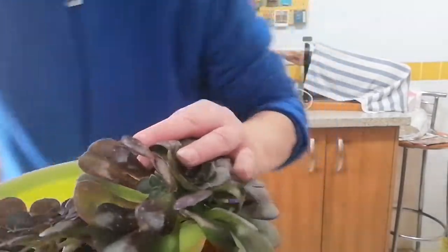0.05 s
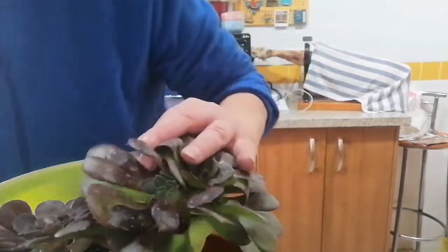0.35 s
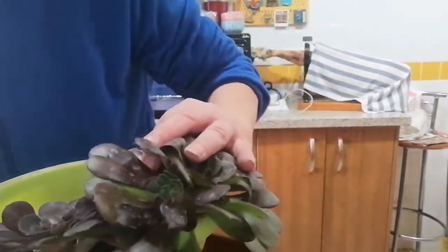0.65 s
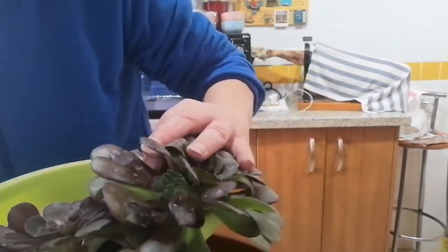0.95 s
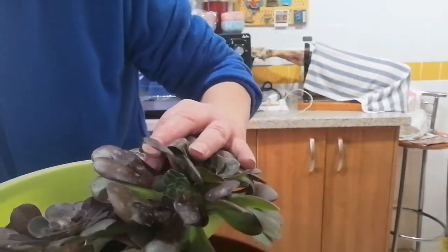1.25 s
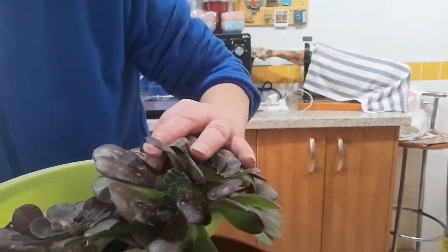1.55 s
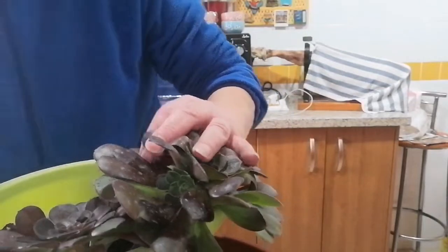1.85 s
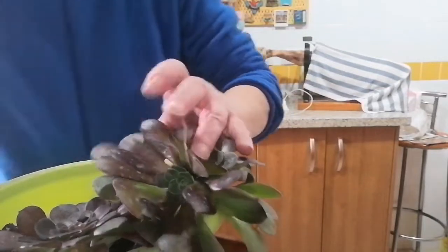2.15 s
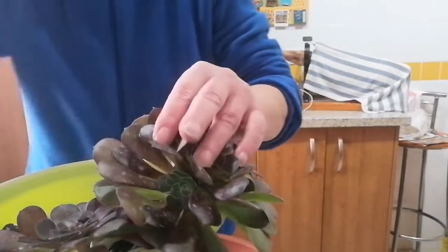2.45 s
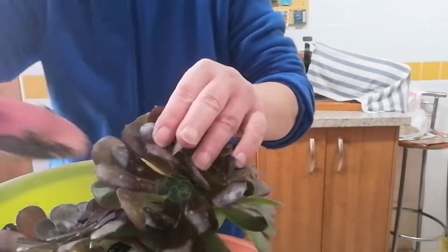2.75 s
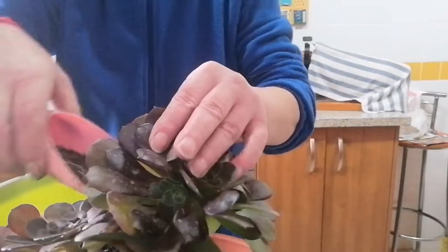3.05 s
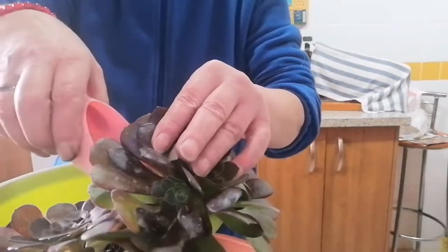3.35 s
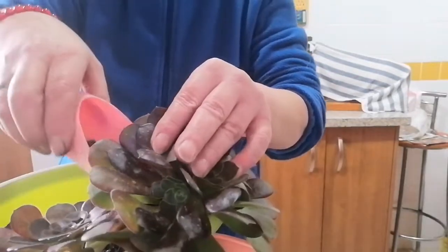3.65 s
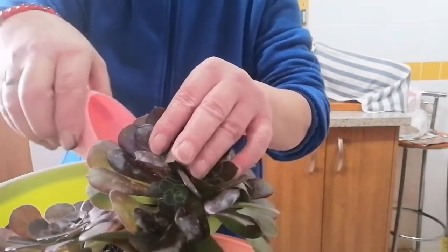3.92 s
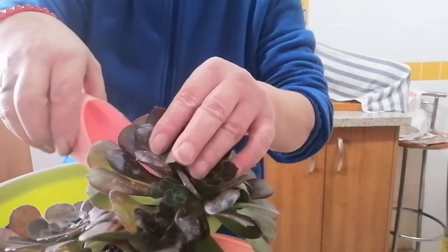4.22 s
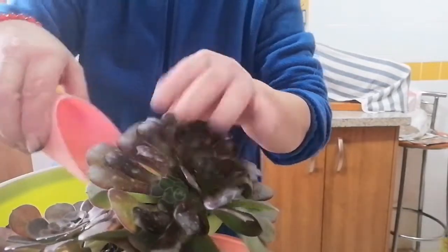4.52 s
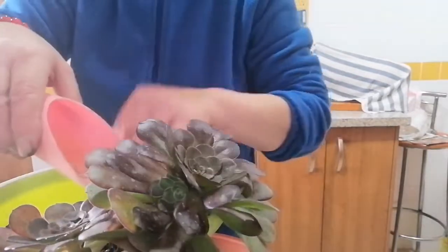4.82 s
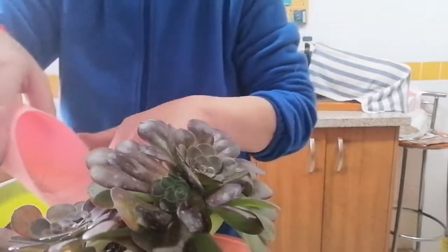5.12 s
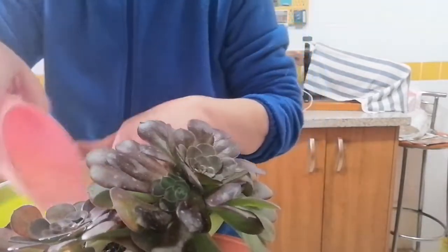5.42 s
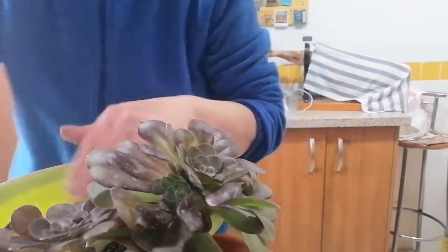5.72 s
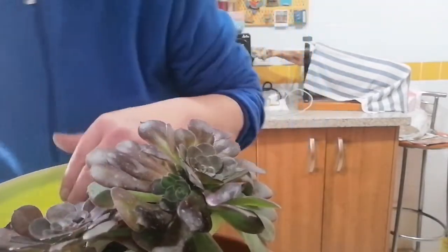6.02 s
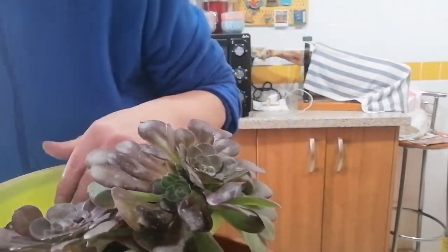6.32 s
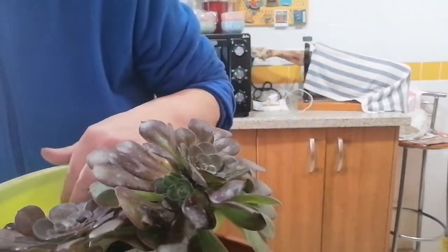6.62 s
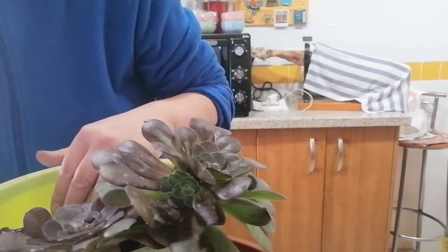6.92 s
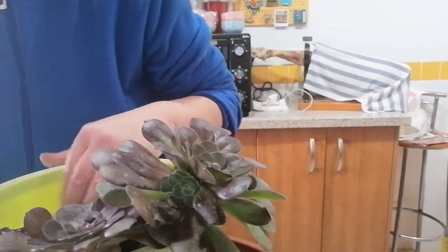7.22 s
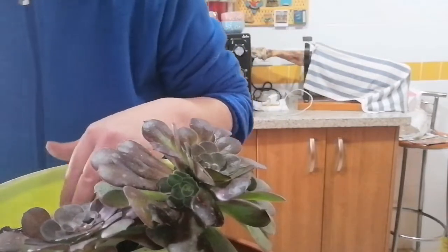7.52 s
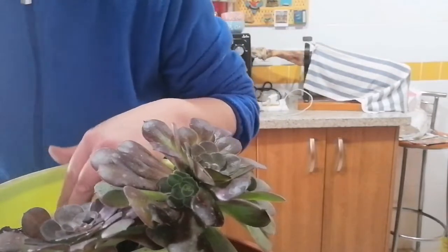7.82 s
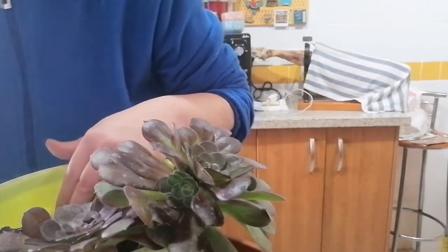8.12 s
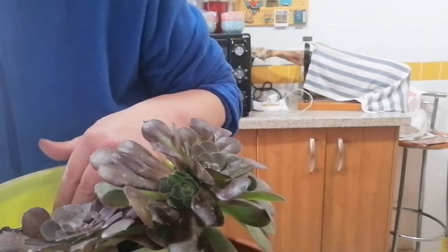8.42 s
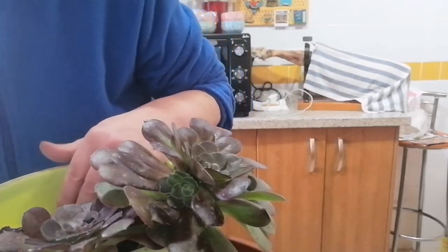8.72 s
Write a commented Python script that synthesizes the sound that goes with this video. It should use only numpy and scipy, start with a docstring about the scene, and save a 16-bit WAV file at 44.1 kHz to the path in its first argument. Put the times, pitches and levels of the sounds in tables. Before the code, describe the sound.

Hands work a potted succulent close to the microphone in a small tiled kitchen. From the start, fleshy leaves rub in short hissing, rasping strokes, with soft hollow knocks on a plastic basin around 0.3 seconds and again between 1 and 1.7. A leaf snaps crisply with a tiny squeak at 0.75 seconds. Smaller snaps follow after 2 seconds, then a cluster of leaf ticks and soil grains tapping a plastic scoop near 2.7 to 3. The scoop scrapes faintly on and off until about 5.9 seconds; a little soil falls at 4, followed by a small squeaky snap. The loudest snaps come at 6 seconds, with two basin knocks, and at 6.4 with a brief squeak. Sparse ticks and light rubbing continue to the end. Underneath are quiet room air, slight table rumble and a faint deep hum swelling near 8 seconds.

```python
"""Handling a potted succulent.

Close up in a small tiled kitchen, fleshy leaves rub by countless tiny slips, tick, squeak and snap off.
Knocks ring a plastic basin and its table; a small hollow scoop scrapes between the leaves; soil falls.
Every slide speeds up, peaks early and slows to a stop. Behind it: room air, table rumble, a late hum."""
import sys
import numpy as np
from scipy import signal
from scipy.fft import rfft, irfft, next_fast_len
from scipy.io import wavfile
from scipy.ndimage import uniform_filter1d, map_coordinates

SR = 44100
rng = np.random.default_rng(int(sys.argv[2]) if len(sys.argv) > 2 else 0)


def master(y):
    """Save y as 16-bit WAV."""
    cut = np.clip(np.atleast_2d(y).T, -1, 1)
    pcm = np.round(cut * 32767)  # scale
    wavfile.write(sys.argv[1], SR, pcm.astype(np.int16))


N = 386316
TIME_S = np.arange(N) / SR

# Finger strokes on the leaves. Each row: start in seconds, length in seconds, hiss in dB, rasp in dB.
STROKES = [(0.161, 0.28, -60, -64), (0.329, 0.2, -53.5, -59), (0.544, 0.13, -56.5, -71),
           (0.663, 0.62, -47.5, -63.5), (0.948, 0.16, -46, -50), (1.155, 0.22, -47, -54.5),
           (1.333, 0.062, -44.5, -48), (1.416, 0.12, -50.5, -49), (1.47, 0.49, -61.5, -61),
           (1.832, 0.37, -59.5, -67), (2.15, 0.32, -55, -71.5), (2.631, 0.25, -46.5, -64.5),
           (2.867, 0.48, -59.5, -71.5), (3.084, 0.27, -60.5, -73), (3.322, 0.48, -59, -69),
           (3.647, 0.13, -50, -63), (3.91, 0.11, -49.5, -62), (4.062, 0.092, -54.5, -63),
           (4.274, 0.12, -59, -77), (4.43, 0.059, -52, -63), (4.676, 0.031, -54.5, -65),
           (4.971, 0.12, -61.5, -68), (5.522, 0.38, -59, -73), (5.724, 0.069, -50, -65.5),
           (5.868, 0.42, -52, -67.5), (6.326, 0.39, -58, -57.5), (7.232, 0.054, -55, -77),
           (7.301, 0.072, -53, -63), (7.869, 0.16, -62, -65), (8.399, 0.14, -53.5, -59.5),
           (8.588, 0.7, -61.5, -70.5)]
# Top treble of the rubbing. Each row: time in seconds, gain in dB.
SHEEN = [(0.7, 12.5), (0.9, 3), (2.7, 12.5), (3.8, 4), (4.2, -4), (5.6, 9)]
# Leaves snapping and striking. Each row: start in seconds, crack in dB, shiver relative to the crack
# in dB, thump in dB, body in dB, crack ring in Hz, body ring in Hz, left over right in dB.
SNAPS = [(0.7472, -33, -32, -38, -37, 7400, 1520, 7.5), (0.778, -44.5, -20, -39, -33, 5300, 880, 1.5),
         (2.1637, -43.5, -13, -81, -85, 5200, 2500, 0.5), (2.4257, -52, -12, -72, -42.5, 6200, 2450, 5.5),
         (4.1985, -48.5, -8, -52, -42, 5300, 3030, -4.5), (6.009, -31, -1, -39.5, -40.5, 5900, 1370, 5),
         (6.0274, -30.5, -6, -64, -43, 8100, 3320, -1.5), (6.3659, -38, 14, -35, -33, 6400, 2650, 2.5),
         (6.4002, -35, -2, -42, -40, 6700, 2700, 2), (7.1256, -47.5, -11, -45, -39, 5400, 1320, 3),
         (7.452, -53.5, -20, -89, -59.5, 5170, 1890, 6.5), (8.1451, -38.5, -30, -56, -57, 7600, 3000, 5.5)]
# Leaf flicks. Each row: start in seconds, edge in dB, blade in dB.
TICKS = [(0.288, -54.5, -52.5), (1.125, -50, -55.5), (2.619, -51, -83), (2.625, -46, -64),
         (2.698, -47, -48), (2.738, -39.5, -45), (2.742, -42, -63), (2.7523, -56, -71), (2.7802, -43, -52),
         (2.88, -51, -65), (2.9207, -47.5, -57), (2.95, -48.5, -68), (3.9273, -53, -75),
         (4.006, -47, -56.5), (4.049, -56, -57), (6.0805, -49, -56), (6.1301, -72, -54),
         (7.5348, -56.5, -70), (8.164, -60, -55.5), (8.1771, -50, -62.5), (8.716, -57, -74)]
# Waxy squeaks. Each row: start in seconds, length in seconds, first and last pitch in Hz, level in dB.
SQUEAKS = [(0.7777, 0.014, 1647, 715, -27.5), (2.165, 0.013, 2610, 2390, -48),
           (2.279, 0.023, 2590, 2460, -57.5), (2.314, 0.021, 3400, 3130, -54),
           (4.1986, 0.0019, 3380, 2900, -26.5), (4.2003, 0.00287, 1760, 1094, -30),
           (6.402, 0.014, 1016, 870, -25.5)]
# Knocks on the basin. Each row: start in seconds, wall in dB, boom in dB.
KNOCKS = [(0.192, -55.5, -65), (0.288, -39, -45), (0.396, -52, -51.5), (1.065, -50.5, -76),
          (1.362, -53.5, -65), (1.51, -60, -58.5), (1.66, -63.5, -71), (2.697, -60.5, -63.5),
          (6.0746, -38.5, -68), (6.13, -40, -39)]
# Modes of the basin on its table. Each row: frequency in Hz, relative level in dB, T60 in seconds.
BOOM_MODES = [(131, -9, 0.17), (143, -8, 0.31), (174.4, -10.5, 0.33)]
WALL_MODES = [(302, -24, 0.44), (340.2, -11, 0.25), (379, -10.5, 0.058), (500, 3.5, 0.048),
              (569.6, 4.5, 0.097)]
# Slides on plastic. Each row: start in seconds, length in seconds, level in dB, resonance in Hz.
SCOOP_SCRAPES = [(2.004, 0.41, -67.5, 822), (3.295, 0.44, -75, 956), (3.624, 0.093, -62.5, 960),
                 (3.93, 0.14, -61, 963), (4.335, 0.036, -56, 993), (4.466, 0.034, -55, 950),
                 (4.681, 0.033, -58, 940), (5.58, 0.29, -63.5, 980)]
BASIN_DRAGS = [(.85, 0.74, -54, 533), (6.645, 0.043, -55, 525), (6.936, 0.067, -56, 550),
               (8.147, 0.17, -57.5, 330)]
# Grains hitting the scoop. Each row: start in seconds, level in dB.
GRIT = [(2.7529, -50), (2.784, -57), (2.893, -63), (2.945, -64), (2.987, -61.5), (3.02, -60)]
# Falling soil and shoves of the pot. Each row: start in seconds, length in seconds, level in dB.
SOIL_FALLS = [(3.95, 0.29, -54.5)]
POT_SHOVES = [(.15, 0.54, -59), (1.125, 0.2, -52.5), (1.3, 0.39, -70), (3.96, 0.67, -61), (4.15, 1.82, -66),
              (8.1, 0.6, -68)]
# Hand position. Each row: time in seconds, left over right in dB.
HAND_PAN = [(0, 5.5), (2.4, 5.5), (2.9, 2), (3.6, 3), (4.1, 0.5), (4.7, -0.5), (5.2, -2.5), (5.8, 4),
            (8.7, 5.5)]
# Deep hum. Each row: time in seconds, level in dB.
HUM_SWELL = [(6.5, -74.5), (8.3, -63.5), (8.8, -63.5)]
# Source spectra. Each row: frequency in Hz, relative density in dB.
HISS_SPECTRUM = [(2120, -38), (3600, -14.5), (4340, -16.5), (5170, -4), (6010, -8), (6900, -1),
                 (10900, -13), (13800, -25), (15100, -17), (16400, -46)]
RASP_SPECTRUM = [(150, -15), (600, -5.5), (1100, -0.5), (2000, 0), (2900, 5), (4000, -10), (6000, -32)]
CRACK_SPECTRUM = [(1500, -47.5), (4200, -3.5), (5400, 5.5), (7200, 3.5), (8800, 3.5), (10500, -6),
                  (13000, -6), (15500, -10.5)]
BODY_SPECTRUM = [(400, -48), (850, 2.5), (1400, 1.5), (2000, 1), (2900, -0.5), (3900, -8.5), (8000, -46)]
THUMP_SPECTRUM = [(40, -26.5), (150, 1.5), (220, -5), (330, 1.5), (560, 1), (1100, -19), (6000, -27)]
RUMBLE_SPECTRUM = [(20, -2.5), (50, -1.5), (90, -1.5), (170, -9), (400, -35.5)]
AIR_SPECTRUM = [(25, -16), (236, -14.5), (301, -2), (427, -11.5), (1040, -11), (1700, -18.5), (2910, -12),
                (3820, -20.5), (6920, -17.5), (10700, -26.5), (14800, -15.5), (16000, -25)]
# Room decay. Each row: frequency in Hz, T60 in seconds.
KITCHEN_T60 = [(120, 0.56), (1500, 0.46), (4000, 0.44), (15000, 0.35)]
# Likeness of the two microphone ports. Each row: frequency in Hz, correlation from 0 to 1.
PORT_COHERENCE = [(60, 0.63), (250, 0.91), (1200, 0.28), (16000, 0.017)]
# Port colour. Each row: frequency in Hz, left over right in dB.
PORT_BALANCE = [(60, -2.5), (250, 2), (700, -3), (1300, -3), (2700, -3.5), (5400, 0.5), (7000, 2.5),
                (9000, -10.5), (12000, -1.5), (15000, 5.5)]
# Late arrival at the right port. Each row: time in seconds, lag in milliseconds.
PORT_LAG = [(2.4, 0.41), (2.9, 0.081), (5.3, 0.027), (5.95, 0.36)]


def leaf_rubbing(resting_db=-74.5):
    """Waxy leaves slide on skin and each other: edges crinkle, a light grip hisses, a firm one rasps."""
    slide = friction()
    crinkles = unit(noise(N) * contacts(per_s=44, spread_db=4, fade_s=0.003))
    slide = slide + amp(-11) * crinkles
    jerks = unit(contacts(per_s=80, spread_db=2.8, fade_s=0.005))
    hiss_gain = np.hypot(slide_gain(row[:3] for row in STROKES), amp(resting_db))
    hiss = hiss_gain * unit(colour(slide * (1 + 0.22 * jerks), HISS_SPECTRUM))
    treble = signal.sosfiltfilt(signal.butter(4, 13000, "high", fs=SR, output="sos"), hiss)
    hiss += (amp(over_time(SHEEN)) - 1) * treble
    rasp_gain = slide_gain((start_s, length_s, db) for start_s, length_s, _, db in STROKES)
    rasp = rasp_gain * unit(colour(slide * (1 + 0.19 * jerks), RASP_SPECTRUM))
    return hand_pan() * (hiss + rasp)


def leaf_snaps():
    """Tissue gives way: the crack and the leaf's body ring briefly, and the stem carries a thump."""
    out = np.zeros((2, N))
    for start_s, crack_db, shiver_db, thump_db, body_db, crack_hz, body_hz, pan_db in SNAPS:
        crack = colour(burst(rise_s=0.0023, shiver_db=shiver_db, shiver_s=0.012), CRACK_SPECTRUM)
        body = colour(burst(rise_s=0.002, shiver_db=-4, shiver_s=0.0053), BODY_SPECTRUM)
        thump = colour(burst(rise_s=0.0026, shiver_db=1, shiver_s=0.014), THUMP_SPECTRUM)
        crack = unit_hit(crack + 1.6 * ring(crack, crack_hz, crack_hz / 4.5))
        body = unit_hit(body + 1.6 * ring(body, body_hz, body_hz / 4.5))
        snap = amp(crack_db) * crack + amp(body_db) * body + amp(thump_db) * unit_hit(thump)
        add(out, start_s, pan(pan_db) * snap)
    return out


def leaf_ticks():
    """Leaf edges flick past each other, each with its own pitch."""
    out = np.zeros((2, N))
    for start_s, edge_db, blade_db in TICKS:
        flick = burst(rise_s=0.0011, shiver_db=-5, shiver_s=0.005)
        edge = colour(flick + ring(flick, hz=rng.uniform(6000, 8500), width_hz=1200), CRACK_SPECTRUM)
        blade = colour(flick + ring(flick, hz=rng.uniform(1100, 2800), width_hz=500), RASP_SPECTRUM)
        add(out, start_s, amp(edge_db) * unit_hit(edge) + amp(blade_db) * unit_hit(blade))
    return out * hand_pan()


def leaf_squeaks():
    """Leaf skin sticks and slips at an uneven pitch, which falls as the tension lets go."""
    out = np.zeros((2, N))
    for start_s, length_s, first_hz, last_hz, db in SQUEAKS:
        count = int(length_s * SR)
        jitter = 0.084 * unit(uniform_filter1d(rng.standard_normal(count), size=30))
        pitch_hz = np.geomspace(first_hz, last_hz, count) * (1 + jitter)
        tone = unit(np.sin(2 * np.pi * np.cumsum(pitch_hz) / SR)) * signal.windows.tukey(count, 0.5)
        add(out, start_s, amp(db) * tone[None])
    return out * hand_pan()


def basin_knocks(cutoff_hz=620, push_db=-1):
    """A soft push sets the basin's wall and the table under it ringing."""
    out = np.zeros((2, N))
    lowpass = signal.butter(5, cutoff_hz, fs=SR, output="sos")
    for start_s, wall_db, boom_db in KNOCKS:
        push = unit_hit(signal.sosfilt(lowpass, burst(rise_s=0.00076, shiver_db=9, shiver_s=0.0033)))
        wall = unit_hit(signal.sosfilt(lowpass, struck(WALL_MODES)))
        add(out, start_s, amp(boom_db) * struck(BOOM_MODES) + amp(wall_db) * wall)
        add(out, start_s, amp(wall_db + push_db) * push)
    return out * hand_pan()


def scoop_scrapes():
    """Gritty scrapes ring the plastic scoop's hollow, whose pitch shifts with load and tilt."""
    out = np.zeros((2, N))
    scrape = friction() * (1 + 0.19 * unit(contacts(per_s=150, spread_db=2, fade_s=0.003)))
    rasp = amp(-10) * unit(colour(scrape, BODY_SPECTRUM))
    for start_s, length_s, db, hz in SCOOP_SCRAPES:
        out += slide_gain([(start_s, length_s, db)]) * unit(hollow(scrape, hz, width_hz=125) + rasp)
    return out * hand_pan()


def grit_taps():
    """Single grains of soil tick against the scoop's wall."""
    out = np.zeros((2, N))
    for start_s, db in GRIT:
        tap = burst(rise_s=0.0006, shiver_db=-14, shiver_s=0.003)
        wall = ring(tap, hz=1137 * rng.uniform(0.95, 1.12), width_hz=90)
        add(out, start_s, amp(db) * unit_hit(wall + 0.06 * colour(tap, RASP_SPECTRUM)))
    return out


def drags_and_soil(wall_q=2.1, overtone_ratio=1.47):
    """Stem and fingers drag on the hand-damped basin wall; soil tumbles into the pot."""
    scrape = friction()
    soil = slide_gain(SOIL_FALLS) * hollow(scrape, hz=136, width_hz=107)
    drags = np.zeros((2, N))
    for start_s, length_s, db, hz in BASIN_DRAGS:
        width_hz = hz / wall_q
        wall = hollow(scrape, hz, width_hz) + amp(-4.5) * hollow(scrape, hz * overtone_ratio, width_hz)
        drags += slide_gain([(start_s, length_s, db)]) * unit(wall)
    return soil + drags * hand_pan()


def kitchen(x, early_db, tail_db):
    """Direct sound, a few reflections from table and body, then the tail of a tiled room."""
    t = np.arange(SR * 2 // 3) / SR
    echoes = at_ports(rng.standard_normal((2, len(t))) * (rng.random((2, len(t))) < 4000 / SR))
    echoes *= 1 - np.exp(-(t / 0.0052) ** 2)
    hz, frame_s, spectra = signal.stft(echoes, SR, nperseg=256)
    decay = amp(-60 * frame_s / at_hz(KITCHEN_T60, hz)[:, None])
    tail = signal.istft(spectra * decay, SR, nperseg=256)[1][:, :len(t)]
    early = np.zeros((2, len(t)))
    for side in early:
        side[(rng.uniform(0.002, 0.016, size=8) * SR).astype(int)] = rng.choice([-1, 1], size=8)
    early = at_ports(early)
    response = amp(early_db) * early / np.linalg.norm(early[0])
    response += amp(tail_db) * tail / np.linalg.norm(tail[0])
    return x + signal.fftconvolve(x, response, axes=1)[:, :N]


def background(air_db=-71, tremor_db=-76.5, hum_hz=35):
    """Still room air, handling rumble through the table, and a deep hum that swells near the end."""
    air = amp(air_db) * unit(colour(noise(N), AIR_SPECTRUM, size=8192))
    rumble_gain = np.hypot(slide_gain(POT_SHOVES), amp(tremor_db))
    rumble = rumble_gain * unit(colour(noise(N), RUMBLE_SPECTRUM, size=8192))
    hum = amp(over_time(HUM_SWELL, outside=-120)) * np.sin(2 * np.pi * hum_hz * TIME_S)
    return air + rumble + hum


def friction(slips_per_s=1500, smooth_db=-3):
    """Tiny slips over a smooth hiss; as the leaves bend, patches of the spectrum swell and fade."""
    slips = (rng.random(N) < slips_per_s / SR) * amp(3 * np.minimum(rng.exponential(1, N), 4))
    slide = at_ports((unit(slips) + amp(smooth_db)) * rng.standard_normal((2, N)))
    spectra = signal.stft(slide, SR, nperseg=256)[2]
    patches = uniform_filter1d(rng.standard_normal(spectra.shape[1:]), size=8, axis=0)
    patches_db = 2.5 * unit(uniform_filter1d(patches, size=6, axis=1))
    grip_db = 1.3 * unit(uniform_filter1d(rng.standard_normal(spectra.shape[2]), size=5))
    return unit(signal.istft(spectra * amp(patches_db + grip_db), SR, nperseg=256)[1][:, :N])


def contacts(per_s, spread_db, fade_s):
    """Envelope of tiny contacts of random time and size."""
    hits = (rng.random(N) < per_s / SR) * amp(spread_db * np.minimum(rng.exponential(1, N), 2))
    return signal.lfilter([1], [1, -np.exp(-1 / (fade_s * SR))], hits + 1e-12)


def slide_gain(rows, peak_share=0.13, roundness=0.69):
    """Envelope of slides that speed up, peak early and slow to a stop; overlaps add in power."""
    power = np.zeros((1, N))
    for start_s, length_s, db in rows:
        progress = np.linspace(0, 1, int(length_s * SR))
        angle = np.interp(progress, [0, peak_share, 1], [0, np.pi / 2, np.pi])
        add(power, start_s, (amp(db) * abs(np.sin(angle[None])) ** roundness) ** 2)
    return np.sqrt(power)


def burst(rise_s, shiver_db, shiver_s):
    """A brief pulse of noise, then a dying shiver."""
    t = np.arange(SR // 8) / SR
    pulse = (t / rise_s * np.exp(1 - t / rise_s)) ** 4
    shiver = amp(shiver_db) * (1 - np.exp(-t / rise_s)) * np.exp(-t / shiver_s)
    return noise(len(t)) * (pulse + shiver)


def struck(modes):
    """Dying modes, slightly detuned at each blow."""
    t = np.arange(SR // 3) / SR
    ringing = sum(amp(db - 60 * t / t60_s) * np.sin(2 * np.pi * hz * t * rng.uniform(0.99, 1.01))
                  for hz, db, t60_s in modes)
    return unit_hit(ringing[None])


def ring(x, hz, width_hz):
    """One resonance of peak gain 1."""
    return signal.lfilter(*signal.iirpeak(hz, hz / width_hz, SR), x)


def hollow(x, hz, width_hz):
    """A steep-sided resonance at rms 1."""
    return unit(ring(ring(x, hz, width_hz), hz, width_hz))


def colour(x, spectrum, size=2048):
    """Causal filter with the given spectrum."""
    log_gain = np.log(amp(at_hz(spectrum, abs(np.fft.fftfreq(size, 1 / SR)))))
    taps = np.fft.ifft(np.exp(np.conj(signal.hilbert(log_gain)))).real
    return signal.oaconvolve(x, taps[None, :size // 2], axes=1)[:, :x.shape[1]]


def at_ports(x):
    """Two close ports hear similar bass and different treble."""
    count = x.shape[1]
    size = next_fast_len(count)
    left, independent = rfft(x, size)
    coherence = at_hz(PORT_COHERENCE, np.fft.rfftfreq(size, 1 / SR))
    right = coherence * left + np.sqrt(1 - coherence ** 2) * independent
    return irfft(np.array([left, right]), size)[:, :count]


def noise(count):
    """White noise at the two ports."""
    return at_ports(rng.standard_normal((2, count)))


def pan(pan_db):
    """Left and right gains of constant power."""
    gains = amp(np.array([pan_db, -pan_db]).reshape(2, -1) / 2)
    return gains / np.sqrt(np.mean(gains ** 2, 0))


def hand_pan():
    """Left and right gains as the hands move around the plant."""
    return pan(over_time(HAND_PAN))


def amp(db):
    """Decibels to gain."""
    return 10 ** (np.asarray(db) / 20)


def unit(x):
    """Scales to rms 1."""
    return x / np.sqrt(np.mean(x ** 2) + 1e-20)


def unit_hit(x):
    """Scales each channel to the energy of 20 ms at rms 1."""
    return x / np.sqrt(np.sum(x ** 2, 1, keepdims=True) / (SR / 50) + 1e-20)


def at_hz(points, hz):
    """Interpolates on a log-frequency axis."""
    points_hz, values = np.transpose(points)
    return np.interp(np.log(hz + 1), np.log(points_hz + 1), values)


def over_time(points, outside=None):
    """Interpolates a time curve at every sample."""
    return np.interp(TIME_S, *np.transpose(points), left=outside, right=outside)


def add(mix, start_s, sound):
    """Mixes a sound in at start_s."""
    part = mix[:, round(start_s * SR):][:, :sound.shape[1]]
    part += sound[:, :part.shape[1]]


def scene():
    """Handling sounds in the kitchen over its background; scoop and squeaks are closer and drier."""
    scoop_send, squeak_send = 0.41, 0.73
    scoop, squeaks = scoop_scrapes(), leaf_squeaks()
    work = leaf_snaps() + leaf_ticks() + basin_knocks() + leaf_rubbing() + drags_and_soil() + grit_taps()
    work += scoop_send * scoop + squeak_send * squeaks
    close = (1 - scoop_send) * scoop + (1 - squeak_send) * squeaks
    return kitchen(work, early_db=-7.5, tail_db=-4.5) + close + background()


def record(dry):
    """Each microphone port has its own colour, the right one hears later, and the band is limited."""
    size = next_fast_len(N + SR // 8)
    port_gains = pan(at_hz(PORT_BALANCE, np.fft.rfftfreq(size, 1 / SR)))
    left, right = irfft(rfft(dry, size) * port_gains, size)[:, :N]
    lag_s = over_time(PORT_LAG) / 1000
    right = map_coordinates(right, [(TIME_S - lag_s) * SR], order=5)
    lowpass = signal.firwin(255, cutoff=16200, window=("kaiser", 9), fs=SR)
    return signal.oaconvolve(np.array([left, right]), lowpass[None], "same")


dry = scene()
out = record(dry)
master(out)
```